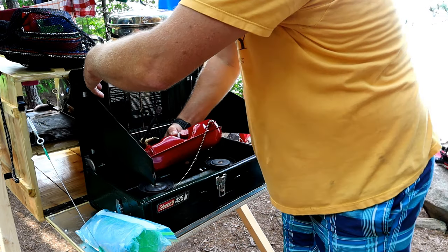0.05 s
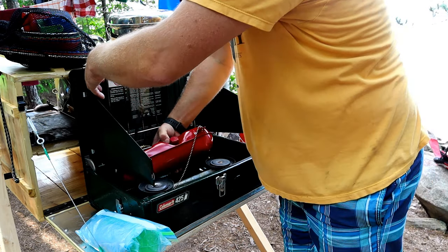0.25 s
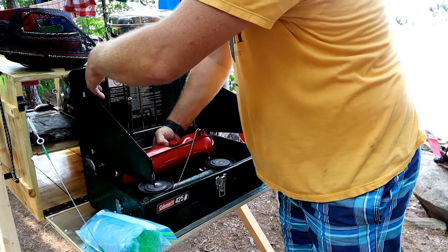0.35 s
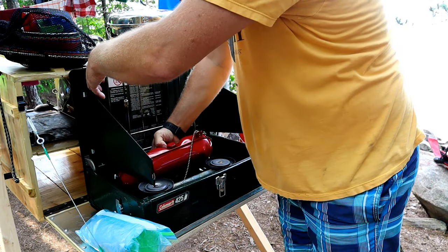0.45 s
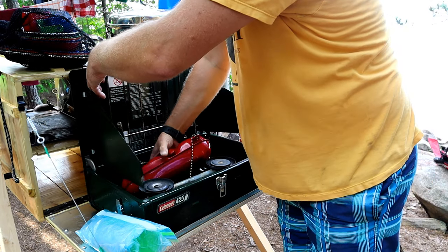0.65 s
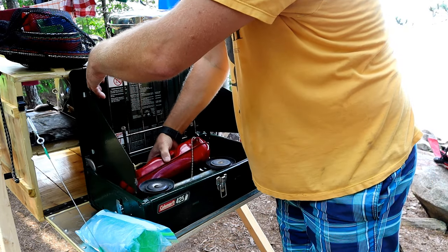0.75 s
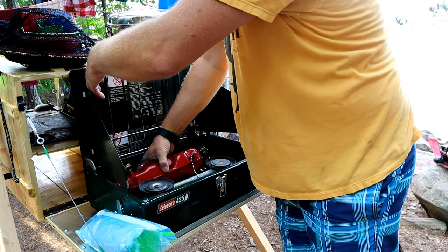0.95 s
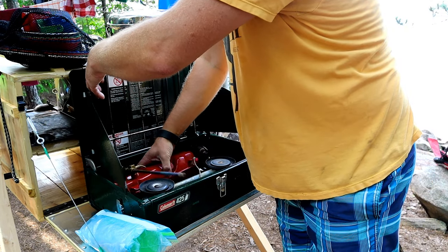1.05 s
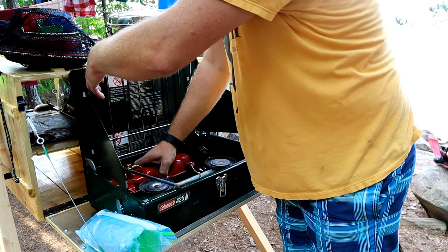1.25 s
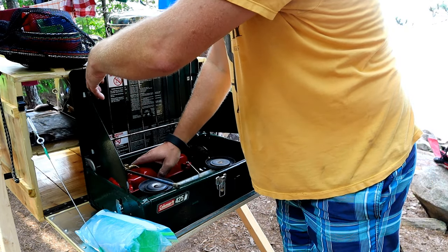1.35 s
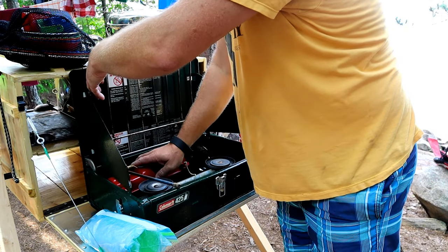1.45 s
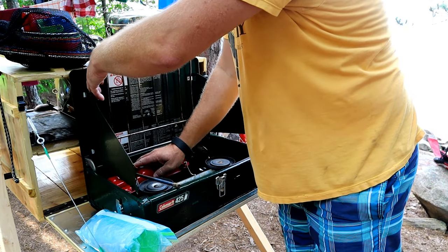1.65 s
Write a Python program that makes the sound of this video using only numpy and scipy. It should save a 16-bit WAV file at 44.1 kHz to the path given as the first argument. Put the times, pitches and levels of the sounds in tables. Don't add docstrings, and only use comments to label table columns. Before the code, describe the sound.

Steel tank lowered into a thin metal stove case: sharp rattling blows, a loudest clank midway, scraping and smaller knocks fading at the end, over quiet outdoor air, heard close in stereo.

```python
import sys
import numpy as np
from scipy import signal
from scipy.fft import rfft, irfft
from scipy.io import wavfile
from scipy.ndimage import uniform_filter1d

SR = 44100
rng = np.random.default_rng(int(sys.argv[2]) if len(sys.argv) > 2 else 0)


def dump_mix(stems):
    frames = np.atleast_2d(stems).T
    limited = np.clip(frames, -1, 1)
    pcm = np.round(limited * 32767).astype(np.int16)
    wavfile.write(sys.argv[1], SR, pcm)


def ratio_of_db(decibels):
    return 10 ** (np.asarray(decibels, float) / 20)


N = 74970

# (time [s], level [dB], centre of ringing modes [Hz], own tone [dB])
PANEL_BLOWS = [(0.213, -5.5, 205, 6), (0.233, -11.5, 193, 3.5), (0.276, -21, 426, -4),
               (0.324, -36.5, 232, 25.5), (0.436, -12, 200, -15), (0.444, -19, 465, -2),
               (0.464, -14, 172, 0), (0.492, -36, 273, 14), (0.606, -20, 245.6, 8), (0.718, -17, 426, -22),
               (0.765, -9, 258, 3), (0.798, -13, 428, 4), (0.873, -13, 191, 1), (0.93, -17.5, 500, -5),
               (0.99, -18, 410, -3), (1.055, -22, 506, 11), (1.166, -27, 300, -8), (1.21, -17.5, 397, 0.5),
               (1.266, -16, 297, -13), (1.29, -28, 350, -7), (1.393, -17, 381, 0), (1.435, -27, 218, 11.5),
               (1.533, -22.5, 303, -17)]
# (time [s], level [dB], centre of ringing modes [Hz], own tone [dB])
TANK_BLOWS = [(0.206, -16.5, 1623, 1), (0.299, -32.5, 1180, 9.5), (0.462, -12.5, 927, 5.5),
              (0.493, -18, 943, 12.5), (0.526, -30.5, 896, 17), (0.549, -45, 940, -7.5),
              (0.602, -25, 910, 9.5), (0.638, -25.5, 1004, -1), (0.716, -13, 1704, 4),
              (0.757, -4.5, 1475, -4.5), (0.799, -3.5, 940, -10), (0.863, -20, 1900, 5),
              (0.934, -8.5, 939, -1), (0.994, -12, 1068, -9), (1.05, -35, 665, -4), (1.097, -22, 900, 1),
              (1.129, -20.5, 1660, 4.5), (1.156, -8.5, 802, -10), (1.179, -10, 903, 6),
              (1.262, -24.5, 858, 14), (1.289, -12.5, 938, -6), (1.329, -17, 908, 0),
              (1.397, -12.5, 980, 0.5), (1.429, -21.5, 970, -5), (1.532, -23.5, 1272, 2.5),
              (1.574, -28.5, 868, 3)]
# (time [s], level [dB], centre of ringing modes [Hz], brightness [dB/octave])
GRATE_BLOWS = [(0.205, -4, 3280, -1), (0.2341, -2.5, 2710, -0.5), (0.2995, -11.5, 2520, 2.5),
               (0.3451, -19.5, 2440, -1), (0.4352, -15, 2840, -0.8), (0.4518, -8, 2290, 1.5),
               (0.468, -5, 2640, 1), (0.4989, -14.5, 2540, 1.5), (0.596, -21.5, 2310, -0.4),
               (0.6396, -24.5, 2120, -1), (0.6895, -15, 2070, 2.5), (0.7157, -8, 2340, 0.5),
               (0.758, 4.5, 2750, -0.55), (0.798, -12, 2034, 4), (0.8491, -6.5, 2125, 1.1),
               (0.885, -8, 2080, 0.3), (0.9378, -12.5, 2070, 6), (0.9944, -13, 2760, -0.1),
               (1.05, -15, 2660, -3), (1.0961, -14, 2950, -2.5), (1.1445, -12.5, 2080, 0.1),
               (1.186, -9, 2960, 2.5), (1.262, -6, 3400, 0), (1.2987, -25, 2400, 27),
               (1.3934, -14, 2070, 0.6), (1.4288, -19.5, 4340, -0.5), (1.5347, -23, 2190, -2.5),
               (1.547, -31.5, 2190, 4)]
# (time
# [s], level [dB], frequency [Hz])
SINGLE_RING_BLOWS = [(0.209, -26, 3360), (0.207, -27, 930), (.452, -16.5, 2170), (0.721, -26, 4660),
                     (0.956, -28.5, 4520), (1.155, -27.5, 1980), (1.206, -30, 193.7), (1.263, -23.5, 1843),
                     (1.298, -51, 6000), (1.398, -31.5, 5140), (1.549, -54, 2037), (1.674, -50, 2205)]
# (frequency [Hz], level over the weak modes [dB], t60 [s])
STRONG_MODES = [(175.3, 9, 0.37), (188.2, 6, 0.057), (259.2, 9.5, 0.16), (397.2, 11.5, 0.21),
                (494.5, 8, 0.086), (695, 7.5, 0.2), (936, 11.5, 0.24), (1654, -0.5, 0.42),
                (1717, 2.5, 0.36), (2350, -16, 0.11), (2372, 7.5, 0.043), (2710, -1, 0.41), (3340, 3, 0.1),
                (4400, 8.5, 0.098)]
# (frequency [Hz], level [dB])
WEAK_MODE_DB = [(60, -38), (174, 6), (400, 1), (925, -10.5), (2750, -12), (8800, -20), (11600, -15.5),
                (15300, -33.5)]
# (frequency [Hz], t60 [s])
WEAK_MODE_T60_S = [(100, 0.46), (500, 0.37), (2000, .22), (6000, 0.17), (14000, 0.048)]
# (time [s], level [dB])
DRAG_PUSH_DB = [(0.43, -51), (0.453, -14.5), (0.5, -24), (0.56, -54), (0.68, -43), (0.7, -20.5),
                (0.73, -16.5), (0.79, -9), (0.9, -38), (0.93, -34), (1.05, -45), (1.15, -42), (1.2, -35),
                (1.302, -54), (1.381, -42.5), (1.44, -35.5), (1.5, -43), (1.62, -77)]
# (time [s], level [dB], frequency [Hz], swell time [s])
SLIDING_TONES = [(0.215, -24, 273, 0.0065), (0.436, -17.5, 177, 0.023), (0.439, -9, 467.5, 0.006),
                 (0.483, -15, 258, .01), (0.54, -29.5, 932, 0.018), (0.455, -28, 4844, 0.019),
                 (0.47, -17, 10100, 0.0062), (0.712, -23, 4480, 0.0092), (0.717, -14, 11600, 0.0063),
                 (0.717, -17, 10740, 0.0074), (0.758, -18, 6500, 0.0087), (0.758, -24, 11600, .005),
                 (0.825, -17, 10200, 0.0077), (0.93, -21.5, 940, 0.014), (0.935, -18.5, 240, 0.0081),
                 (0.935, -26, 560, 0.012), (0.942, -18, 406, 0.0096), (0.985, -24, 553, 0.0063),
                 (0.99, -23.5, 398, 0.0094), (1.09, -29, 503, 0.039), (1.154, -16, 398.3, 0.017),
                 (1.152, -15.5, 936, 0.01), (1.155, -22, 551, 0.011), (1.158, -21, 193, 0.011),
                 (1.155, -24, 10570, 0.017), (1.19, -27, 4500, 0.0078), (1.187, -28, 6110, 0.016),
                 (1.262, -19.5, 247, 0.0066), (1.27, -20, 700.6, .016), (1.28, -17, 930, 0.0083),
                 (1.3, -47, 6250, 0.033), (1.32, -39, 11700, .02), (1.395, -29.5, 687, 0.0062),
                 (1.41, -25.5, 420, 0.014), (1.398, -21.5, 1310, 0.005), (1.424, -23.5, 4450, 0.0051),
                 (1.545, -40, 11500, 0.0075), (1.59, -43, 10600, 0.0044), (0.465, -22, 857, .012),
                 (0.716, -19, 1777, 0.006)]
# (time [s], level [dB], frequency [Hz])
STAND_THUDS = [
    (0.216, -42, 82),
    (0.458, -40, 79),
    (0.779, -33, 63),
    (0.802, -28.5, 121.7),
    (1.158, -33, 104.8),
    (1.431, -39.5, 81.7),
    (1.538, -45.5, 165),
]
# (frequency [Hz], density [dB/Hz])
AIR_SPECTRUM_DB = [(15, -33), (30, 2), (90, -1.5), (200, -3), (419, -0.5), (1230, -6), (3490, -5.5),
                   (7600, -15.5), (11100, -9.5), (15300, -8)]
# (frequency [Hz], correlation [0..1])
PORT_LIKENESS = [(30, .994), (150, .9994), (420, .997), (700, .92), (1500, .91), (3000, .74), (6000, .56),
                 (12000, .7)]
# (frequency [Hz], lead [rad])
LEFT_LEAD_RAD = [(450, .03), (650, .45), (1900, .25), (2900, 1.3), (6000, 1.3), (9000, 1.9), (12000, 2.6),
                 (15000, 3.1)]
# (frequency [Hz], level [dB])
LEFT_OVER_RIGHT_DB = [(300, 0), (1200, .5), (2500, -1.8), (5000, 2.7), (9000, 0)]


def evened(x):
    return x / np.sqrt(np.mean(abs(x) ** 2) + 1e-20)


def read(points, hz):
    f, value = np.transpose(points)
    return np.interp(np.log(hz + 1), np.log(f + 1), value)


def slow_wobble(samples):
    smooth = uniform_filter1d(rng.standard_normal(N), size=samples)
    return evened(uniform_filter1d(smooth, size=samples))


def dying(hz, t60_s):
    rise_cycles = 0.29
    t = np.arange(SR // 3) / SR
    turns = np.outer(hz, t)
    decay = ratio_of_db(-60 * np.outer(1 / t60_s, t))
    return np.sin(2 * np.pi * turns) * decay * (1 - np.exp(-turns / rise_cycles))


def stove_modes(count=600):
    strong_hz, strong_db, strong_t60_s = np.transpose(STRONG_MODES)
    place, luck = rng.random((2, count))
    weak_hz = 70 + 15300 * ((np.arange(count) + place) / count) ** 1.7
    hz = np.r_[strong_hz, weak_hz]
    weak_t60_s = read(WEAK_MODE_T60_S, weak_hz) * (0.5 + luck)
    t60_s = np.clip(np.r_[strong_t60_s, weak_t60_s], 0.02, 2)
    gap = (hz / 15370) ** (0.7 / 1.7)
    level_db = read(WEAK_MODE_DB, hz) + np.r_[strong_db, np.zeros(count)]
    size = ratio_of_db(level_db) * np.sqrt(gap / t60_s)
    spread_db = np.r_[np.full(len(strong_hz), 1.5), np.full(count, 4.0)]
    return hz, size, spread_db, dying(hz, t60_s)


def contacts(start_s, db, centre_hz, tone_db, tilt_db, modes, octaves, rattle_s):
    bounces_per_s, bounce_spread_db, tone_t60_s = 1100, 2.5, 0.12
    hz, size, spread_db, tones = modes
    count = len(start_s)
    out, t = np.zeros((2, N + SR)), np.arange(SR // 8) / SR
    away_oct = np.log2(hz / centre_hz[:, None])
    tilt = ratio_of_db((tilt_db + 0 * db)[:, None] * away_oct)
    reach = size * np.exp(-0.5 * (away_oct / octaves) ** 2) * tilt
    luck = rng.standard_normal((count, 2, 2, len(hz)))
    mixes = ratio_of_db(spread_db * luck[:, 0]) * np.sign(luck[:, 1]) * reach[:, None]
    rings = (mixes.reshape(-1, len(hz)) @ tones).reshape(count, 2, -1)
    own = ratio_of_db(tone_db + 0 * db)[:, None] * dying(centre_hz, tone_t60_s + 0 * db) * np.sqrt(2)
    chance = rng.random((count, 3, len(t)))
    for s, gain, ring, tone, (when, big, sign) in zip(start_s, ratio_of_db(db), rings, own, chance):
        size_db = bounce_spread_db * np.minimum(-np.log(1 - big), 2)
        hits = (when < bounces_per_s / SR) * ratio_of_db(size_db) * np.sign(sign - 0.5)
        hits = 0.3 * hits * np.exp(-t / rattle_s)
        hits[0] = 1
        sound = signal.fftconvolve(ring, hits[None], axes=1)[:, :len(tone)]
        sound = sound / np.sqrt(np.mean(sound[:, :600] ** 2)) + tone
        first = round(s * SR)
        out[:, first:first + len(tone)] += gain * sound
    return out[:, :N]


def clatter(modes):
    s, db, hz, tilt_db = np.transpose(GRATE_BLOWS)
    return contacts(s, db - 8, hz, -18, tilt_db, modes, octaves=1.764, rattle_s=0.018)


def knocks(modes):
    s, db, hz, tone_db = np.transpose(TANK_BLOWS)
    return contacts(s, db - 10.5, hz, tone_db, 0, modes, octaves=0.57, rattle_s=0.0098)


def booms(modes):
    s, db, hz, tone_db = np.transpose(PANEL_BLOWS)
    return contacts(s, db - 10.5, hz, tone_db, 0, modes, octaves=0.54, rattle_s=0.011)


def pings(modes):
    s, db, hz = np.transpose(SINGLE_RING_BLOWS)
    return contacts(s, db, hz, -10.5, 0, modes, octaves=0.058, rattle_s=0.0027)


def drag(modes, spots=6):
    centre_hz, octaves, slips_per_s, slip_spread_db = 3880, 2.46, 1500, 3.5
    hz, size, _, tones = modes
    weak = np.arange(len(hz)) >= len(STRONG_MODES)
    reach = size * np.exp(-0.5 * (np.log2(hz / centre_hz) / octaves) ** 2) * weak
    rings = (reach * rng.standard_normal((spots, 2, len(hz)))) @ tones
    when, big = rng.random((2, spots, 1, N))
    slip_db = slip_spread_db * np.minimum(-np.log(1 - big), 2)
    slips = (when < slips_per_s / spots / SR) * ratio_of_db(slip_db)
    push = ratio_of_db(np.interp(np.arange(N) / SR, *np.transpose(DRAG_PUSH_DB)))
    ring_power = np.mean(np.sum(rings ** 2, axis=2))
    scale = np.sqrt(np.mean(slips ** 2) * spots * ring_power)
    return signal.fftconvolve(rings, slips * push, axes=2).sum(axis=0)[:, :N] / scale


def swells():
    t, out = np.arange(N) / SR, np.zeros(N)
    wobble_rad = 0.22 * slow_wobble(300)
    for s, db, hz, swell_s in SLIDING_TONES:
        u = np.clip((t - s) / swell_s, 0, 50)
        out += ratio_of_db(db) * np.sin(2 * np.pi * hz * (t - s) + wobble_rad) * u * np.exp(1 - u)
    return out


def thuds():
    swell_s = 0.042
    t, out = np.arange(N) / SR, np.zeros(N)
    wobble_rad = 0.3 * np.pi * slow_wobble(700)
    for s, db, hz in STAND_THUDS:
        u = np.clip((t - s) / swell_s, 0, 50)
        out += ratio_of_db(db) * np.sin(2 * np.pi * hz * (t - s) + wobble_rad) * u * np.exp(1 - u)
    return out


def air():
    level_db, duck_db, duck_s = -45, -5.5, 0.14
    frames, hz = N // 256 + 5, np.fft.rfftfreq(1024, 1 / SR)
    a, b, c, d, patches = rng.standard_normal((frames, 513, 5)).T
    patches = uniform_filter1d(patches, size=14, axis=0)
    patches_db = 2 * evened(uniform_filter1d(patches, size=10, axis=1))
    z = np.array([a + 1j * b, c + 1j * d]) * ratio_of_db(read(AIR_SPECTRUM_DB, hz)[:, None] + patches_db)
    hiss = evened(signal.istft(z, nperseg=1024, noverlap=768)[1][:, :N])
    duck = np.clip((np.arange(N) / SR - duck_s) * 20, 0, 1)
    return ratio_of_db(level_db) * hiss * ratio_of_db(duck_db * duck)


def ports(pair):
    hz = np.fft.rfftfreq(N, 1 / SR)
    a, b = rfft(pair, axis=1)
    same = np.clip(read(PORT_LIKENESS, hz), 0, 1)
    side = ratio_of_db(read(LEFT_OVER_RIGHT_DB, hz) / 2)
    right = (same * a + np.sqrt(1 - same ** 2) * b) * np.exp(-1j * read(LEFT_LEAD_RAD, hz))
    return irfft(np.array([a * side, right / side]), N, axis=1)


def scene():
    modes = stove_modes()
    blows = clatter(modes) + knocks(modes) + booms(modes) + pings(modes)
    slides = drag(modes) + swells() * np.array([[1], [0.5]])
    return ports(blows + slides + thuds() + air())


def band_limit(x):
    return signal.sosfilt(signal.butter(12, 15430, fs=SR, output="sos"), x)


def record(dry):
    grip_s, ceiling_db, recover_db_per_s = 0.0016, -12, 48.5
    step = 1 / (grip_s * SR)
    power = signal.lfilter([step], [1, step - 1], (dry ** 2).mean(0))
    level_db = 10 * np.log10(power + 1e-12)
    fall_db = np.arange(N) * recover_db_per_s / SR
    held_db = np.maximum.accumulate(level_db + fall_db) - fall_db
    over_db = np.maximum(held_db - ceiling_db, 0)
    limited = dry / ratio_of_db(0.68 * over_db)
    return band_limit(np.clip(limited, -1, 1))


dry = scene()
out = record(dry)
dump_mix(out)
```